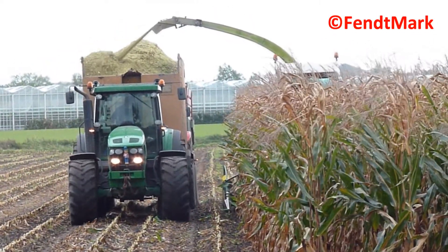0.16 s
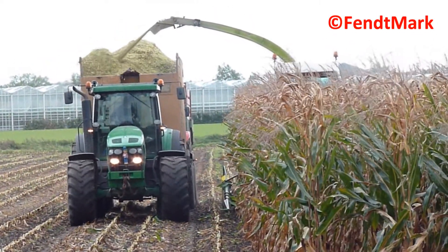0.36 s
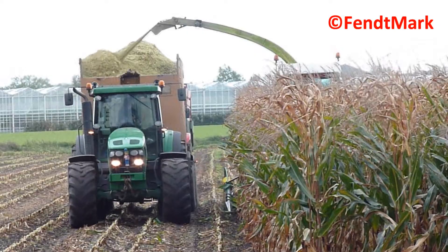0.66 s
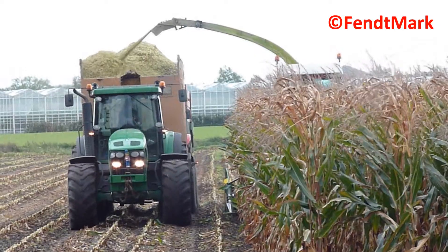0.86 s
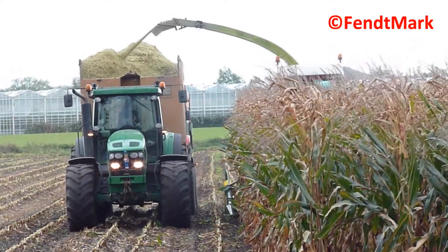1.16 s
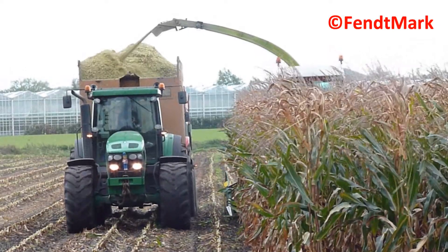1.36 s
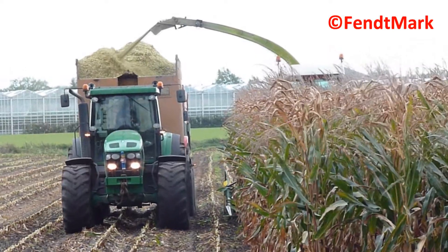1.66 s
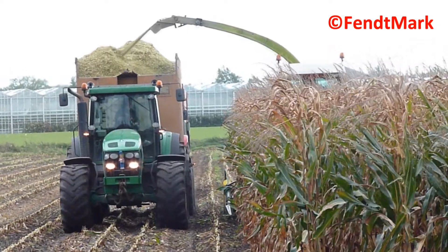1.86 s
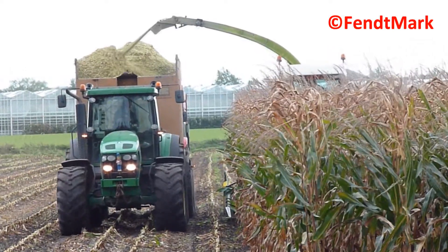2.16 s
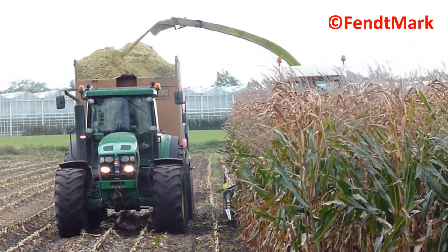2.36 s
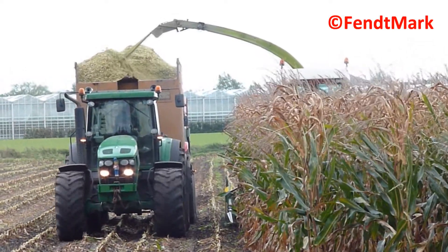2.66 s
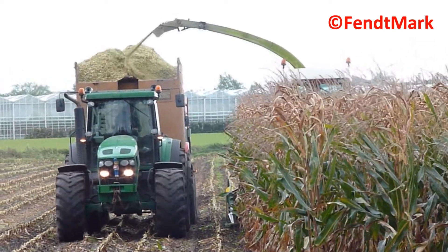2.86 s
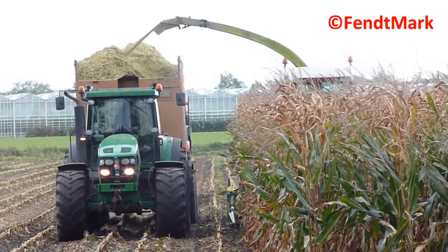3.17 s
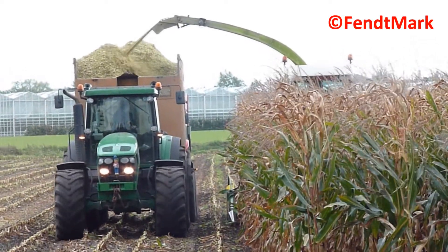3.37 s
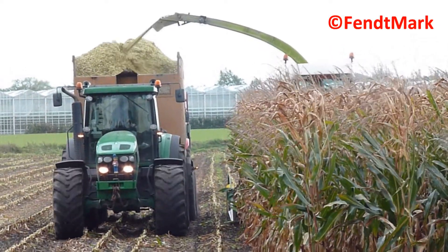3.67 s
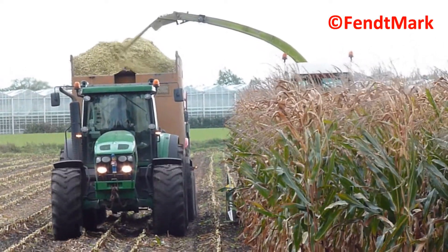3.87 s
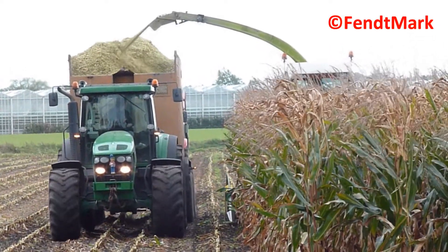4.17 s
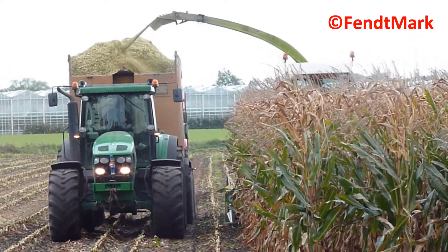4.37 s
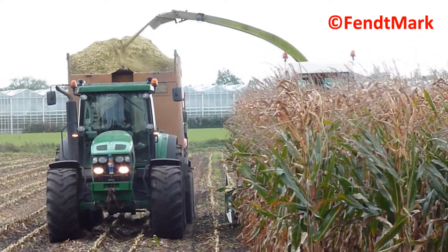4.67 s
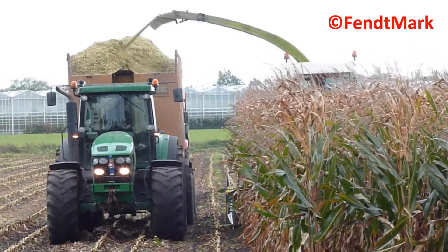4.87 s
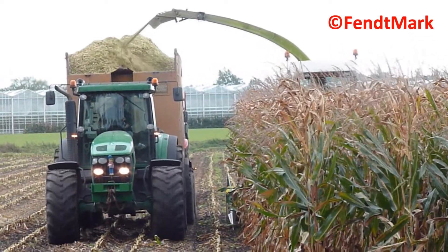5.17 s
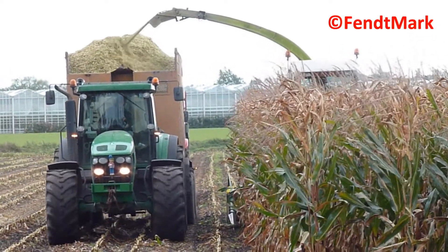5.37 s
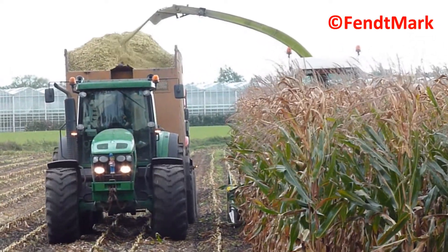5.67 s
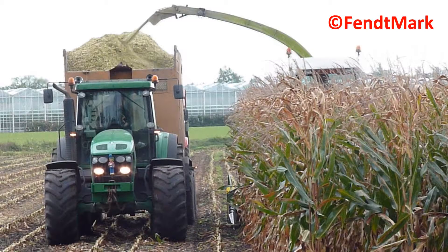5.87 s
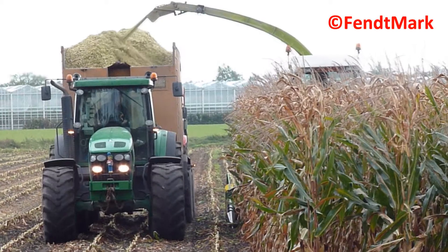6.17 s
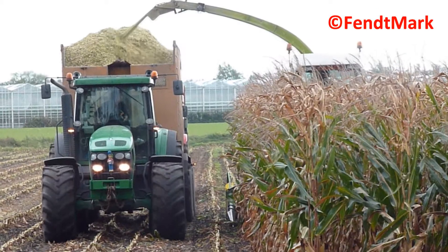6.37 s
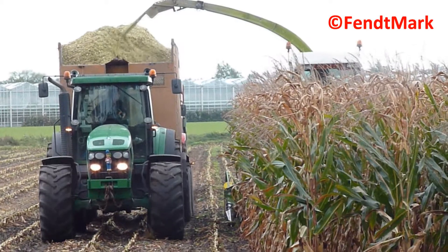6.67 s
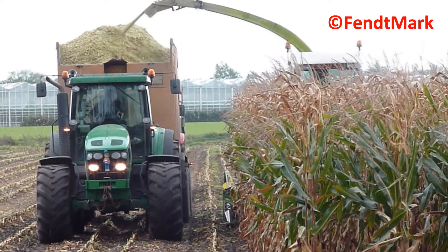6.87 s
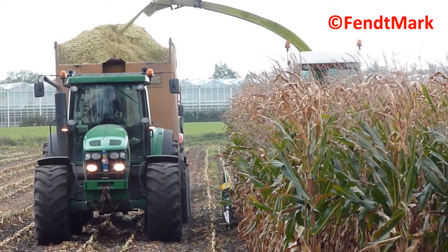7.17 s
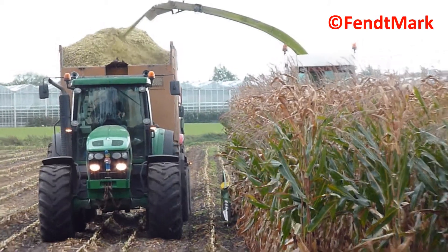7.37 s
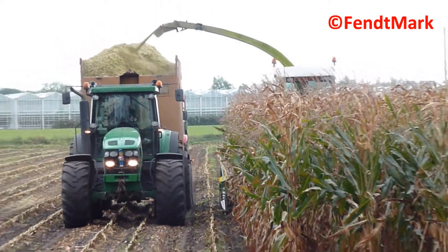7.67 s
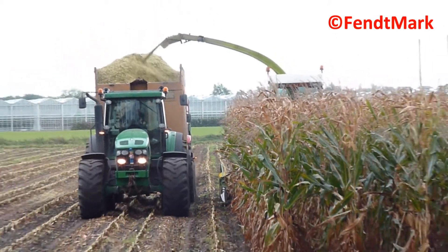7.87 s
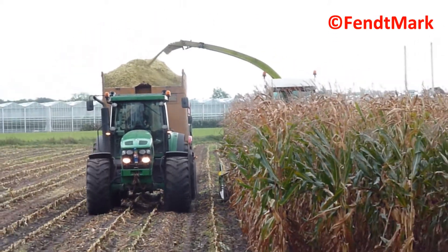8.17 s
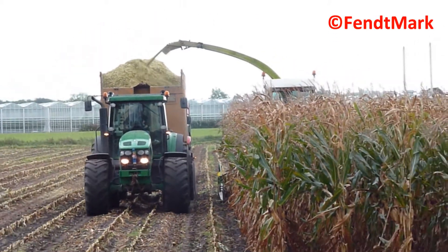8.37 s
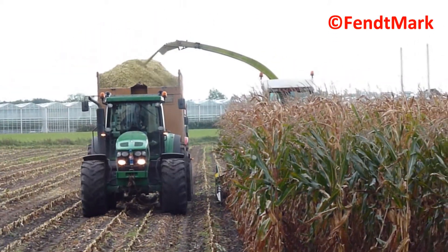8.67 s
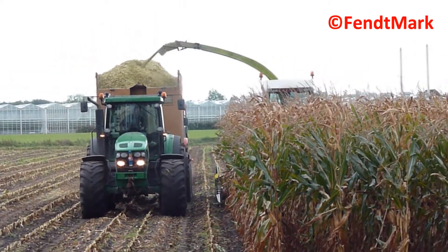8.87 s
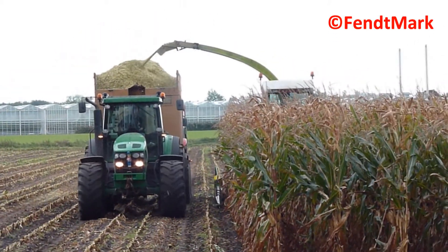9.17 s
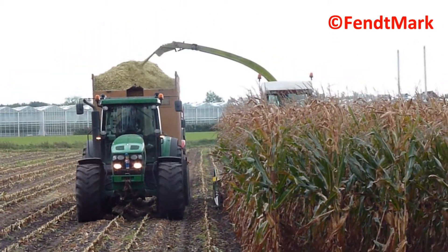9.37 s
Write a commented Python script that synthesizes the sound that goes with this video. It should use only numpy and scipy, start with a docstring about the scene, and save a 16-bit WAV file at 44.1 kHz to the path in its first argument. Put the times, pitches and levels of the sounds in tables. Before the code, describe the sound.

Steady howling drone of a harvester cutting maize, with crunching stalks, hissing chaff and a tractor rumbling beneath.

```python
"""A forage harvester chops maize while a tractor with a trailer creeps alongside, both slowly nearing.
From the start the knife drum howls over a swelling drone, sagging and recovering with the load. The flow
of crop drives the roar and crunch of stalks and the hiss of chaff from the spout; a diesel runs beneath.
Hard lumps knock in the drum housing twice around 1.5 s and five more times between 5.2 and 6.6 s.
Over the last three seconds a metallic whine stands out and the chopping grows a little louder."""
import sys
import numpy as np
from scipy import signal
from scipy.fft import rfft, irfft, next_fast_len
from scipy.io import wavfile

SR = 44100
rng = np.random.default_rng(int(sys.argv[2]) if len(sys.argv) > 2 else 0)


def wav_out(sig):
    """Save sig, one row per channel (or a flat mono array), as 16-bit PCM at SR to the path in sys.argv[1]."""
    wavfile.write(sys.argv[1], SR, np.round(np.clip(np.atleast_2d(sig).T, -1, 1) * 32767).astype(np.int16))


N = 420273
TIME = np.arange(N) / SR
HUM_HZ = 60.4  # the machine's low hum, which also pulses the chaff


def gain_of(db):
    """Decibels to amplitude."""
    return 10 ** (np.asarray(db) / 20)


def unit_rms(x):
    """Scales to an rms of 1."""
    return x / np.sqrt(np.mean(abs(x) ** 2) + 1e-20)


def curve_at(points, hz):
    """Reads a curve on a log-frequency axis."""
    f, value = np.transpose(points)
    return np.interp(np.log(hz + 1), np.log(f + 1), value)


def follow(rows):
    """An envelope: straight ramps between timed breakpoints."""
    return np.interp(TIME, *np.transpose(rows))


def flutter(width_hz):
    """A slow random modulator, complex and of rms 1, spread over the given bandwidth."""
    size = 8192
    hz = np.fft.fftfreq(size, TIME[-1] / size)
    white = rng.standard_normal(size) + 1j * rng.standard_normal(size)
    slow = np.fft.ifft(white / (1 + (2 * hz / width_hz) ** 2))
    return unit_rms(np.interp(TIME, np.linspace(0, TIME[-1], size), slow))


def flicker(depth, width_hz):
    """A random tremolo gain of rms 1."""
    return unit_rms(gain_of(depth * flutter(width_hz).real))


def tone(cycles, rough, width_hz):
    """A partial of rms near 1; rough is the share of its power smeared around the pitch."""
    body = np.sqrt(1 - rough) + np.sqrt(rough) * flutter(width_hz)
    return np.sqrt(2) * (body * np.exp(2j * np.pi * (cycles + rng.random()))).real


def noise(spectrum):
    """Coloured stereo noise, rms 1 in the middle; its treble arrives from many sides and sounds wide."""
    # stereo width: f/Hz, side against mid/dB
    width = [(40, -18), (100, -26), (150, -39), (215, -45.5), (300, -33.5), (450, -34.5), (560, -38),
             (750, -29.5), (900, -20.5), (1050, -25), (1300, -20.5), (1750, -14.5), (2150, -15),
             (2650, -13), (2850, -7.5), (3250, -4), (3500, -7), (3700, -10.5), (3900, -7), (4120, -0.5),
             (4400, -6), (4600, -5), (5000, -10), (5400, -8.5), (6200, -14), (7000, -11.5), (7550, -7.5),
             (7850, -2.5)]
    size = next_fast_len(N)
    hz = np.fft.rfftfreq(size, 1 / SR)
    mid, side = rfft(rng.standard_normal((2, size)))
    side = side * gain_of(curve_at(width, hz))
    colour = gain_of(curve_at(spectrum, hz)) * (hz < spectrum[-1][0])
    pair = irfft(np.array([mid + side, mid - side]) * colour, size)[:, :N]
    return pair / np.std(pair.mean(0))


def machinery_bed():
    """Both machines rumble, throb and hum; a metallic whine holds its pitch and grows as they near."""
    # colours of the rumble and of the engines' low throb: f/Hz, density/dB
    rumble_colour = [(20, -66.5), (44, -63.5), (52, -46.5), (70, -43.5), (100, -28), (140, -18), (175, -7),
                     (230, -0.5), (265, -5), (320, -9.5), (390, 0), (445, -1.5), (485, -13.5), (700, -43.5)]
    throb_colour = [(90, -28.5), (135, -9), (160, 0), (180, 3), (205, -2.5), (250, -24.5)]
    # envelopes of the throb and the metallic whine: t/s, level/dB
    throb_level = [(0, -46), (0.45, -46), (0.75, -53), (1.1, -50.5), (2.05, -46.5), (2.45, -62),
                   (2.95, -51), (4.1, -57), (4.3, -46), (4.8, -55), (5.1, -51), (5.95, -48), (6.15, -56.5),
                   (7.85, -54), (8.2, -49), (8.45, -57), (9.3, -54), (9.53, -43)]
    metal_level = [(0, -57), (5.2, -56), (6.5, -52), (6.85, -49), (7.25, -49), (7.6, -54), (7.88, -46.5),
                   (8.08, -49), (8.35, -48), (8.8, -46.5), (9.53, -51)]
    hum = gain_of(-74.5) * tone(HUM_HZ * TIME, rough=0.02, width_hz=3)
    upper_hum = gain_of(-55) * tone(176.2 * TIME, rough=0.64, width_hz=8)
    throb = gain_of(follow(throb_level)) * noise(throb_colour)
    metal = gain_of(follow(metal_level)) * tone(1359 * TIME, rough=0.85, width_hz=42)
    rumble = gain_of(-36) * noise(rumble_colour)
    return hum + upper_hum + throb + metal + rumble


def tractor_diesel():
    """The exhaust sounds harmonics of the engine cycle, held nearly steady by the governor."""
    # exhaust partials: multiple of the cycle rate, level/dB
    partials = [(5, -84), (6, -79.5), (7, -64), (8, -57), (9, -61), (18, -56.5)]
    cycle_hz = 16.73
    cycles = np.cumsum(cycle_hz * (1 + 0.005 * flutter(width_hz=0.92).real)) / SR
    return sum(gain_of(db) * tone(k * cycles, rough=0.22, width_hz=5.1) for k, db in partials)


def chaff_spout(flow_db):
    """Chaff hisses up the steel spout and sets it ringing, both louder as more crop flows."""
    # colour of the hiss: f/Hz, density/dB
    chaff_colour = [(1800, -30), (2800, -7.5), (3050, 0), (3350, -3), (3750, 1), (4300, 0), (5000, 1),
                    (5800, 0.5), (6200, 3), (6650, -0.5), (7000, 0.5), (7500, -8), (7750, -16.5),
                    (8000, -39.5)]
    # envelopes of the hiss and the ringing at average flow: t/s, level/dB
    hiss_level = [(0, -49.5), (1.0, -50), (2.6, -49.5), (3.8, -49), (4.9, -49), (5.4, -48.5), (5.8, -49),
                  (6.6, -48.5), (7.1, -50), (7.8, -49), (8.6, -48.4), (9.53, -47.5)]
    ring_level = [(0, -59.5), (1.9, -59), (2.7, -58), (2.95, -54), (3.12, -53), (3.28, -54), (3.45, -62),
                  (4.08, -54), (4.45, -59.5), (4.85, -59.5), (5.2, -54), (5.55, -61), (5.98, -55),
                  (6.15, -57.5), (6.5, -58.5), (7.45, -63), (8.2, -60), (8.7, -63), (9.15, -55.5),
                  (9.53, -60)]
    ring_hz, ring_width_hz = 3740, 290
    hiss = gain_of(follow(hiss_level) + 1.1 * flow_db) * noise(chaff_colour)
    resonance = signal.iirpeak(ring_hz, ring_hz / ring_width_hz, fs=SR)
    steel = unit_rms(signal.lfilter(*resonance, noise(chaff_colour)))
    ring = gain_of(follow(ring_level) + 1.4 * flow_db) * steel
    pulse = 1 + 0.05 * np.cos(2 * np.pi * HUM_HZ * TIME)
    spray = flicker(depth=0.77, width_hz=61)
    return (hiss + ring) * pulse * spray


def housing_knocks():
    """Hard lumps in the crop give dull, heavily damped knocks in the drum housing."""
    # knocks: t/s, envelope peak/dB, f/Hz, attack/s
    hits = [(1.295, -23.5, 565.2, .0015), (1.607, -22.5, 740, .0012), (5.261, -18, 640.1, 0.0011),
            (5.561, -21, 686, 0.0015), (6.005, -24.5, 242, 0.006), (6.08, -25.5, 675.3, 0.0014),
            (6.537, -25, 577, 0.0014)]
    out = np.zeros(N)
    for start, db, hz, attack_s in hits:
        t = np.maximum(TIME - start, 0)
        envelope = (t / attack_s) * np.exp(1 - t / attack_s)
        out += gain_of(db) * envelope * np.sin(2 * np.pi * hz * t)
    return out


def chopped_stalks(strikes, flow_db):
    """Stalks roar and crunch as they are cut in lumps, pulsing slightly with the knives."""
    # colours of the roar and the crunch: f/Hz, density/dB
    roar_colour = [(300, -43.5), (470, -8.5), (520, 0.5), (620, 0.5), (760, 0.5), (840, -3.5), (940, -11.5),
                   (1200, -21), (2000, -51.5)]
    crunch_colour = [(600, -30.5), (980, 1), (1250, 0), (1480, 1.5), (1800, -7), (2050, -6.5), (2400, -16),
                     (2800, -21), (4000, -45.5)]
    # envelope of the roar, before flow and trim: t/s, level/dB
    roar_level = [(0.0, -34), (0.36, -33), (0.87, -33.5), (1.74, -33.5), (2.3, -34), (3.3, -34.5),
                  (4.2, -34), (4.6, -33), (5.58, -34.5), (5.85, -34), (9.53, -31.5)]
    cuts = unit_rms(1 + 0.091 * np.cos(2 * np.pi * strikes))
    lumps = flicker(depth=0.8, width_hz=52)
    surges = flicker(depth=0.79, width_hz=10)
    roar = gain_of(follow(roar_level) + flow_db - 1.55) * surges * noise(roar_colour)
    bites = flicker(depth=0.55, width_hz=26)
    approach_db = 0.23 * TIME
    crunch = gain_of(-42 + approach_db + 1.2 * flow_db) * bites * noise(crunch_colour)
    return (roar + crunch) * cuts * lumps


def knife_drum(strikes, flow_db):
    """Knives passing the shear bar howl; the uneven mat of stalks roughens every harmonic."""
    # envelopes of harmonics 1 to 5 of the knife rate, before any trim or flow: t/s, level/dB
    drone_level = [(0, -49), (0.14, -35), (0.2, -51), (0.32, -30), (0.5, -54), (0.74, -51), (0.8, -33.5),
                   (1.04, -43), (1.08, -34.5), (1.26, -37), (1.6, -36.5), (1.88, -31.5), (1.95, -49),
                   (2.0, -39.5), (2.16, -51), (2.22, -38), (2.72, -39), (2.84, -32), (2.98, -45),
                   (3.04, -35), (3.1, -42), (3.34, -34.5), (3.92, -35), (3.98, -53), (4.22, -48.8),
                   (4.26, -38.5), (4.6, -32), (5.02, -41.5), (5.22, -36), (5.38, -45), (5.52, -33.5),
                   (5.76, -35), (5.95, -43), (6.0, -37), (6.22, -42), (6.28, -31.5), (6.4, -45),
                   (6.48, -35), (7.02, -35.5), (7.14, -43), (7.3, -52), (7.36, -33.5), (7.5, -30),
                   (7.62, -41), (8.54, -37), (8.6, -48), (8.72, -36), (8.86, -48), (8.9, -35.5),
                   (9.22, -34.5), (9.28, -42), (9.53, -38.5)]
    howl_level = [(0.0, -36), (0.12, -33), (0.48, -33), (0.56, -30.5), (0.74, -29.5), (0.86, -31.5),
                  (0.94, -30), (1.06, -31.5), (1.12, -40), (1.18, -30.5), (1.24, -35.2), (1.3, -27.5),
                  (1.36, -37), (1.46, -27), (1.6, -35.5), (1.9, -34), (2.06, -32.5), (2.12, -28.5),
                  (2.32, -29.5), (2.68, -33), (3.04, -30.5), (3.08, -27), (3.46, -28.5), (3.5, -31),
                  (3.68, -28), (3.8, -34.5), (3.86, -26.5), (4.42, -30), (5.24, -27.5), (5.3, -35.5),
                  (5.36, -28), (5.54, -33), (5.58, -29.5), (5.9, -33.5), (6.0, -30.5), (6.08, -33),
                  (6.2, -27), (6.33, -29), (6.53, -29.5), (6.58, -33.5), (6.8, -31), (7.24, -30),
                  (7.5, -35.5), (7.6, -30), (7.68, -31.5), (7.86, -27.5), (8.0, -30.5), (8.32, -28.5),
                  (8.4, -36.5), (8.46, -27), (8.5, -35.1), (8.58, -28.5), (8.8, -31), (8.86, -25),
                  (8.96, -35), (9.14, -33.5), (9.23, -36.5), (9.29, -30.5), (9.44, -30.0), (9.52, -37.5)]
    blare_level = [(0, -54), (0.3, -45), (0.42, -38), (0.58, -44.5), (2.35, -45), (2.6, -42), (2.95, -48),
                   (3.85, -49), (4.04, -37.5), (4.25, -43.5), (5.2, -45), (5.4, -33), (5.55, -35.5),
                   (5.72, -44.5), (6.9, -44.5), (8.3, -47), (8.5, -38), (8.75, -40.5), (8.98, -47),
                   (9.15, -36), (9.53, -46)]
    rasp_level = [(0, -54.5), (2.4, -53), (3.4, -47), (4.1, -47.5), (4.8, -53), (9.53, -53)]
    whine_level = [(0, -57), (1.1, -52.5), (1.85, -54.5), (2.15, -48), (4.0, -47), (4.4, -52.5),
                   (5.35, -48), (5.7, -59), (6.85, -56), (7.17, -48.5), (7.55, -55), (8.05, -48),
                   (8.65, -50), (9.05, -48.5), (9.53, -53)]
    drone = gain_of(follow(drone_level) + 0.2) * tone(strikes, rough=0.12, width_hz=24)
    howl = gain_of(follow(howl_level) + 0.47) * tone(2 * strikes, rough=0.033, width_hz=19)
    blare = gain_of(follow(blare_level) + 0.3) * tone(3 * strikes, rough=0.3, width_hz=20)
    rasp = gain_of(follow(rasp_level) + flow_db) * tone(4 * strikes, rough=0.7, width_hz=66)
    whine = gain_of(follow(whine_level)) * tone(5 * strikes, rough=0.6, width_hz=33)
    ratio_turns = 1.3418 * strikes  # a further tone, locked at 1.34 times the knife rate
    ratio_tone = gain_of(-49.5) * tone(ratio_turns, rough=0.092, width_hz=2.9)
    return drone + howl + blare + rasp + whine + ratio_tone


def scene():
    """Drum speed sets the pitch and beat of the cutting; crop flow rides the rasp, stalks and chaff."""
    # knife strike rate as the drum sags and recovers under load: t/s, f/Hz
    knife_rate = [(0.0, 225), (0.12, 222), (0.3, 222.5), (0.52, 224.5), (1.1, 226.1), (1.66, 222.9),
                  (2.3, 224.6), (2.4, 227.2), (2.74, 230), (3.12, 224.7), (3.56, 226.4), (3.72, 224.5),
                  (3.82, 226.2), (3.88, 222.9), (4.08, 224.6), (4.16, 226.5), (4.74, 227.7), (4.9, 226),
                  (5.36, 230.2), (5.7, 228.4), (5.82, 228.1), (6.1, 224), (6.32, 223.7), (6.72, 226.1),
                  (6.8, 224.6), (6.98, 226.1), (7.08, 222.7), (7.24, 226.5), (7.32, 223.4), (7.68, 224.6),
                  (8.12, 222.2), (8.46, 225.1), (8.54, 223.7), (8.9, 226.7), (8.98, 228.3), (9.36, 225.6),
                  (9.42, 228), (9.52, 225.6)]
    # crop flow against its average: t/s, level/dB
    crop_flow = [(0.0, 0.3), (1.06, 1.3), (1.4, -0.9), (1.58, 0.6), (1.66, -0.5), (1.82, -0.7), (1.9, -3),
                 (2.04, 1), (2.6, -0.5), (2.68, 1.1), (2.88, -1), (2.98, 0.9), (3.28, 0.2), (3.5, -0.1),
                 (3.72, -0.6), (3.82, 1), (3.9, -0.8), (4.2, 0.5), (4.64, -2), (5.06, 1.1), (5.16, -1),
                 (5.42, 1.5), (5.64, -0.6), (5.84, 1), (6.18, -0.6), (6.84, 1), (6.92, -0.1), (7.22, 1.5),
                 (7.6, -1.5), (7.86, 1.5), (8.24, -0.0), (8.76, 0.6), (8.92, -1.1), (9.02, 1.3),
                 (9.22, -1.3), (9.52, 1.6)]
    tug_hz = 0.548 * flutter(width_hz=15.9).real  # single stalks tug at the drum
    strikes = np.cumsum(follow(knife_rate) + tug_hz) / SR
    flow_db = follow(crop_flow) + 0.31 * flutter(width_hz=14).real
    cutting = knife_drum(strikes, flow_db) + chopped_stalks(strikes, flow_db) + housing_knocks()
    return cutting + chaff_spout(flow_db) + tractor_diesel() + machinery_bed()


def record(dry):
    """Two microphone ports differ in level and phase; then come a low cut, notches and a high cut."""
    # stereo balance: f/Hz, left minus right/dB
    balance = [(300, 0), (1200, -0.5), (1750, -2), (2350, -1), (2700, 1), (2850, .2), (3080, 8),
               (3550, 1.5), (3830, 4.2), (4100, 1.2), (4570, 0.5), (4740, 3.1), (5000, 3.5), (5400, 1),
               (5650, 2.4), (6000, 1.5), (6600, 1.7), (7500, -1.1)]
    # phase between the ports: f/Hz, lead of the left/rad
    phase_lead = [(250, 0), (450, -0.062), (560, -.02), (680, -.085), (1000, -0.098), (1600, -0.17),
                  (2450, .27), (2750, .24), (2970, .76), (3280, -.86), (3650, -.58), (3850, -.9),
                  (4010, -1.3), (4150, -.28), (4350, .05), (5000, -0.42), (5900, -1.01), (7700, -1.42)]
    # notches in the microphone's response: f/Hz, width/Hz
    notches = [(2600, 214), (4600, 790), (5430, 320)]
    low_cut_hz, high_cut_hz = 48, 8000
    size = next_fast_len(N + 2048)
    hz = np.fft.rfftfreq(size, 1 / SR)
    lean = gain_of(curve_at(balance, hz) / 2) * np.exp(0.5j * curve_at(phase_lead, hz))
    pair = irfft(rfft(dry, size) * np.array([lean, 1 / lean]), size)[:, :N]
    pair = signal.sosfilt(signal.butter(4, low_cut_hz, "highpass", fs=SR, output="sos"), pair)
    for notch_hz, width_hz in notches:
        pair = signal.lfilter(*signal.iirnotch(notch_hz, notch_hz / width_hz, fs=SR), pair)
    high_cut = signal.firwin(511, high_cut_hz, window=("kaiser", 9), fs=SR)
    return signal.oaconvolve(pair, high_cut[None], "same")


dry = scene()
out = record(dry)
wav_out(out)
```